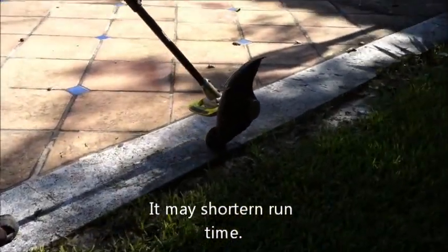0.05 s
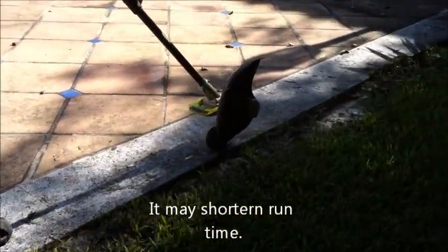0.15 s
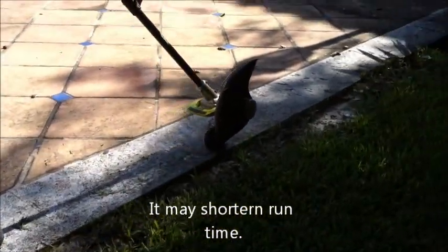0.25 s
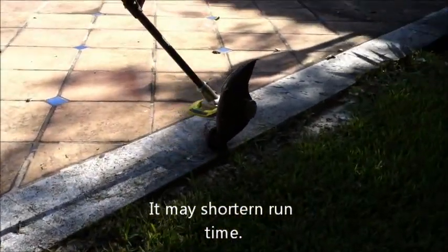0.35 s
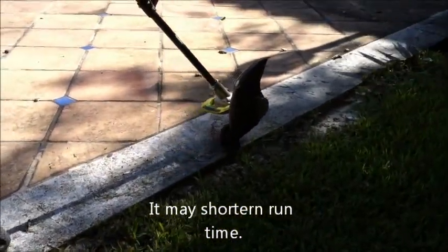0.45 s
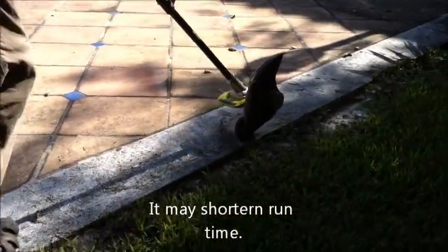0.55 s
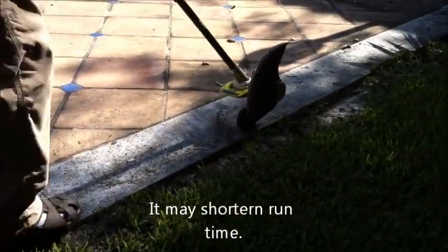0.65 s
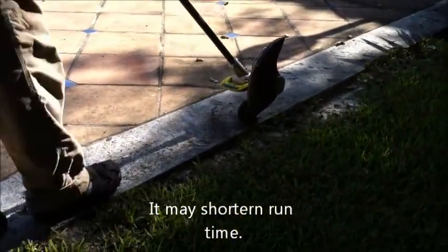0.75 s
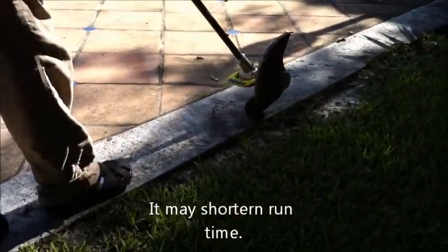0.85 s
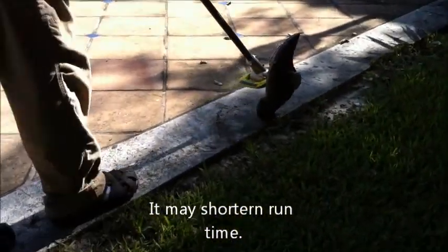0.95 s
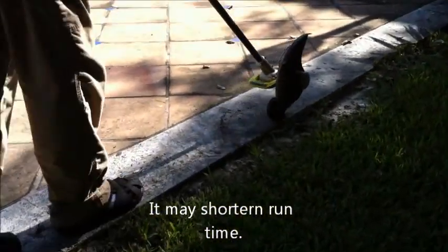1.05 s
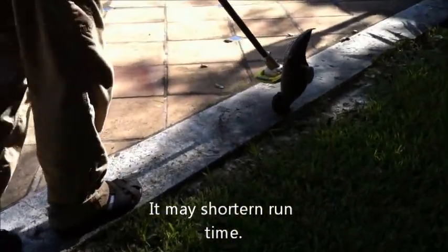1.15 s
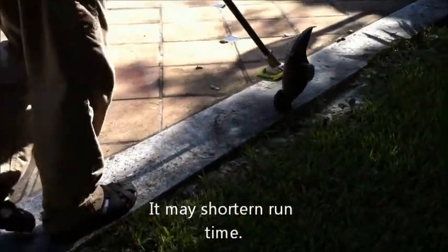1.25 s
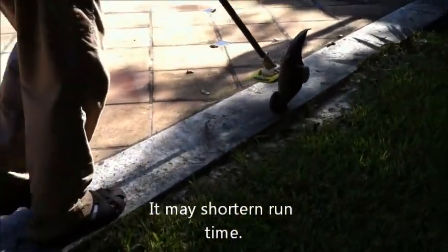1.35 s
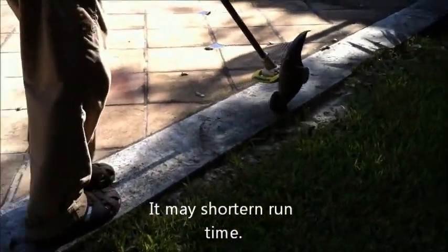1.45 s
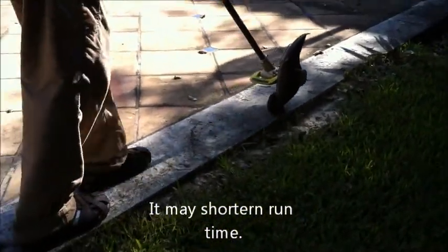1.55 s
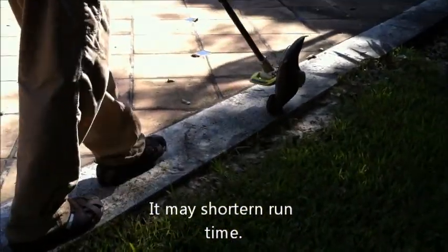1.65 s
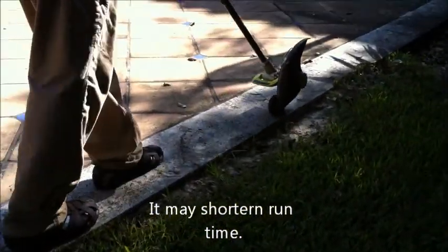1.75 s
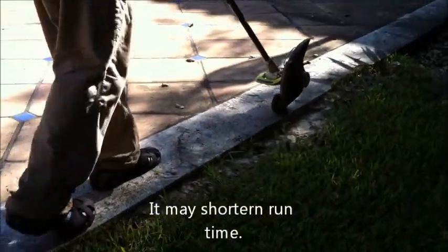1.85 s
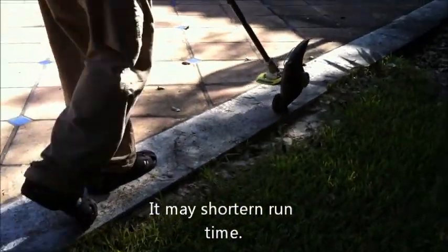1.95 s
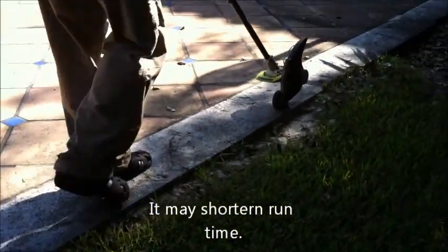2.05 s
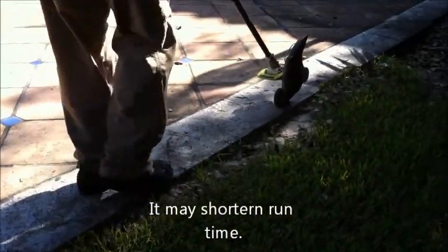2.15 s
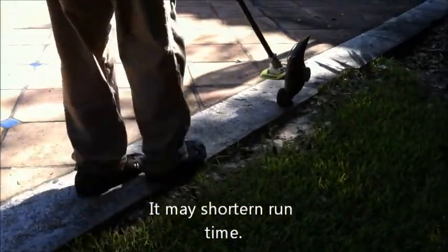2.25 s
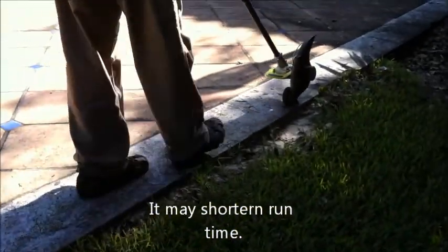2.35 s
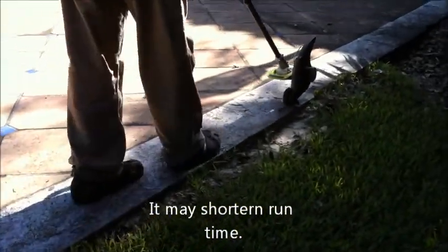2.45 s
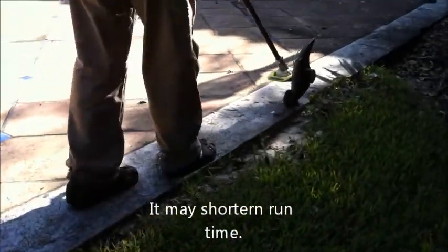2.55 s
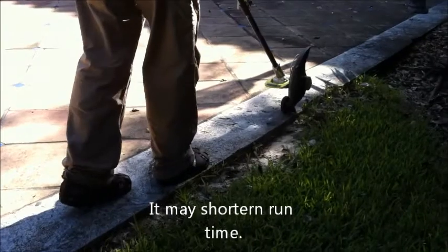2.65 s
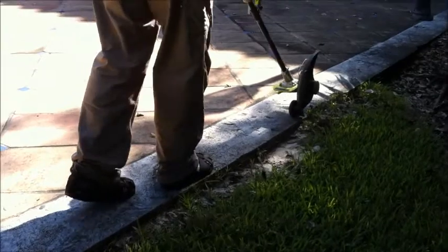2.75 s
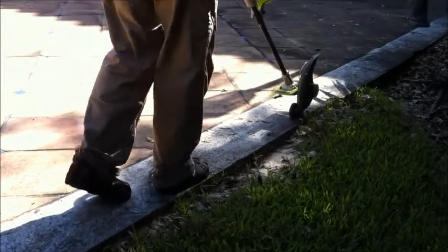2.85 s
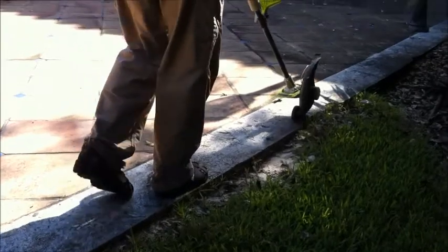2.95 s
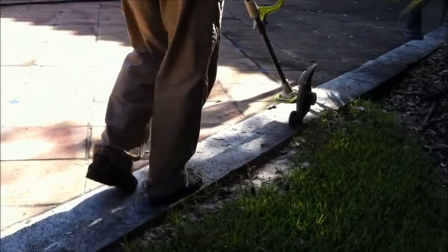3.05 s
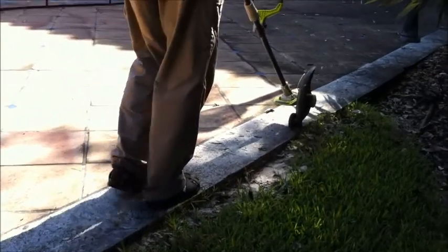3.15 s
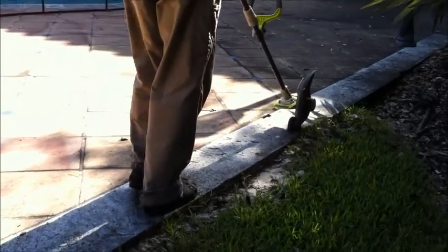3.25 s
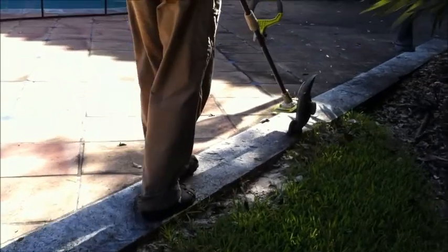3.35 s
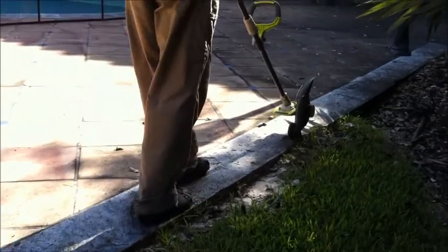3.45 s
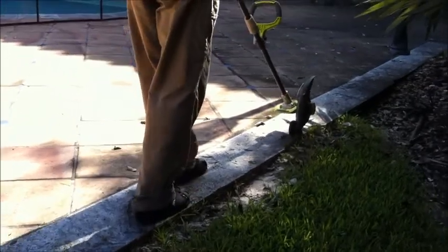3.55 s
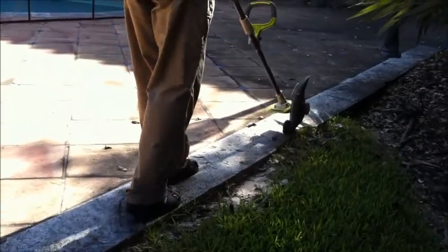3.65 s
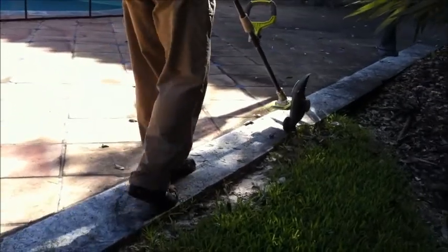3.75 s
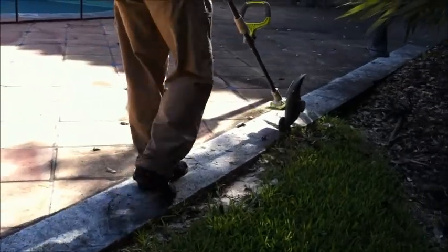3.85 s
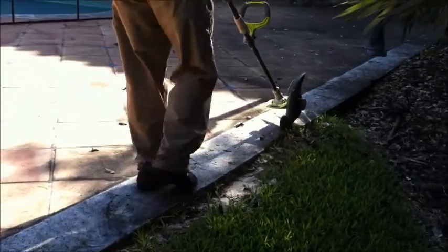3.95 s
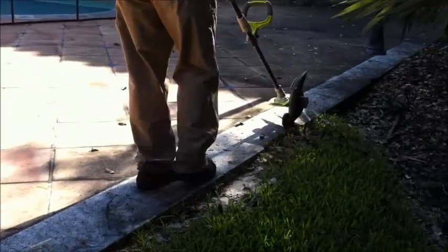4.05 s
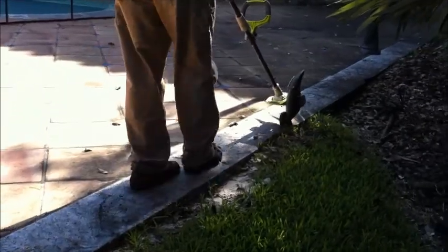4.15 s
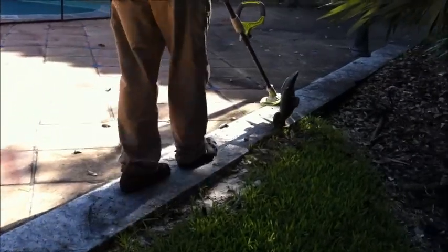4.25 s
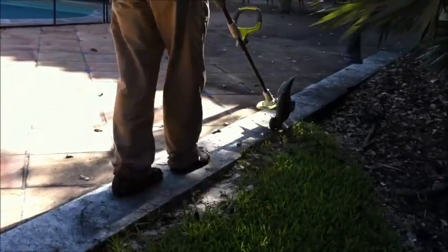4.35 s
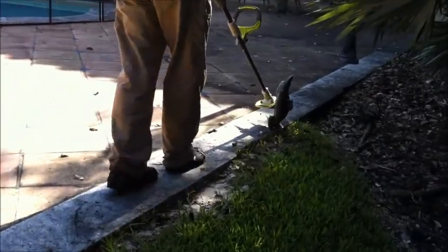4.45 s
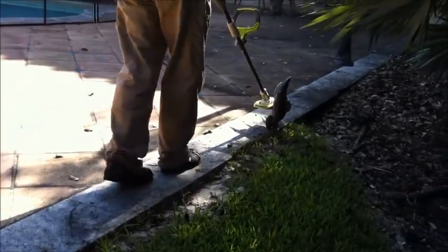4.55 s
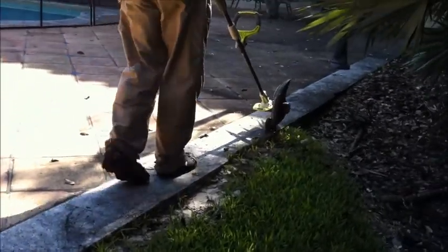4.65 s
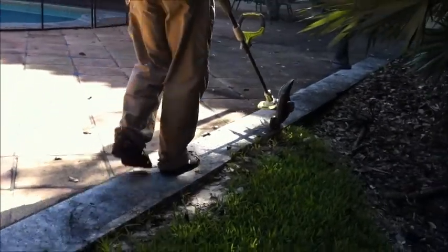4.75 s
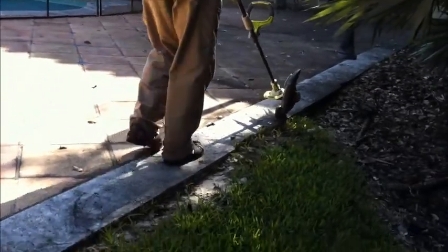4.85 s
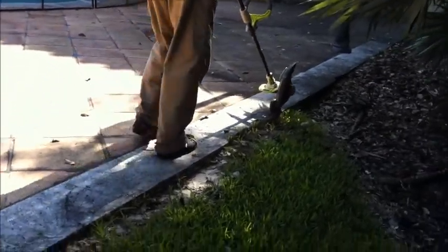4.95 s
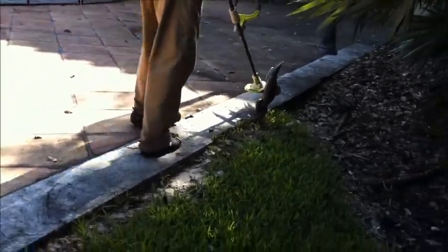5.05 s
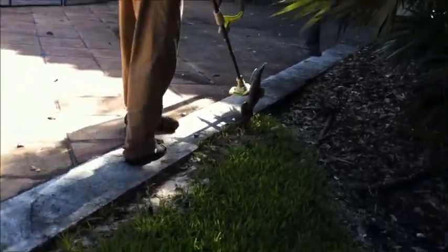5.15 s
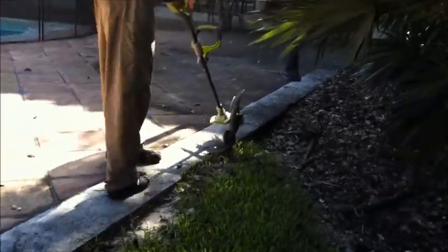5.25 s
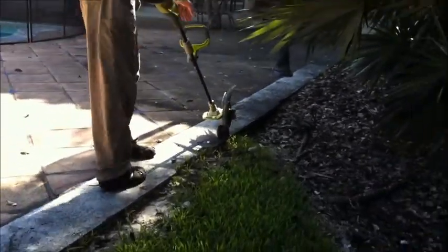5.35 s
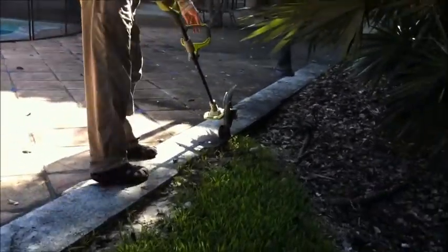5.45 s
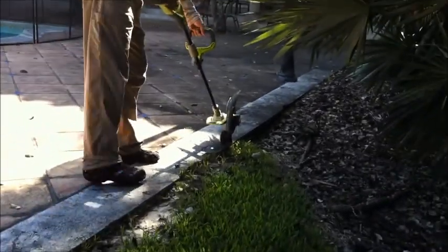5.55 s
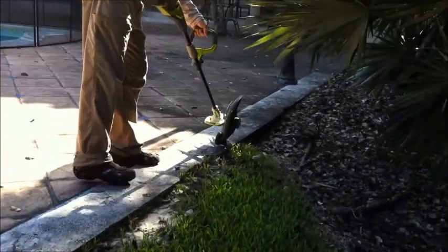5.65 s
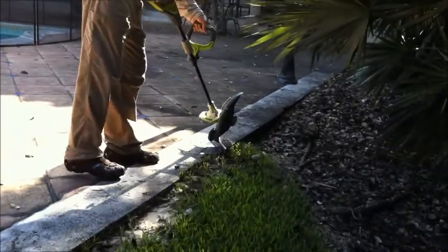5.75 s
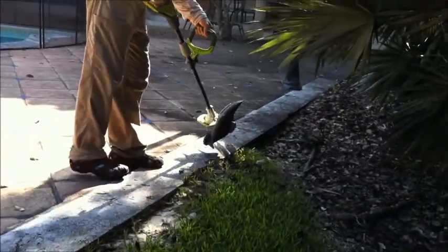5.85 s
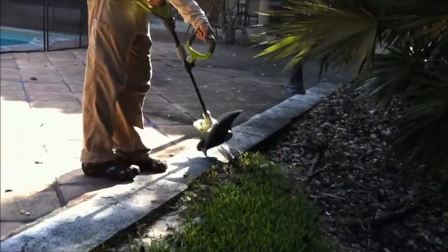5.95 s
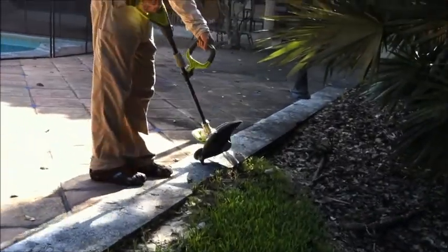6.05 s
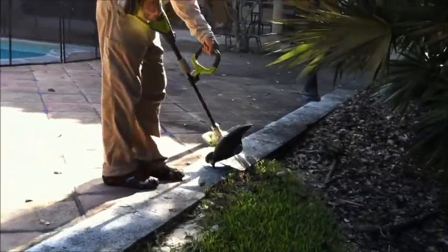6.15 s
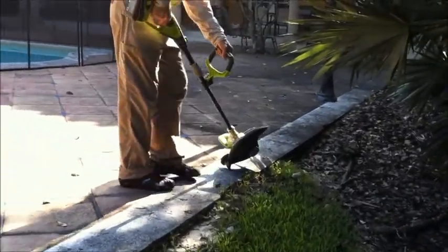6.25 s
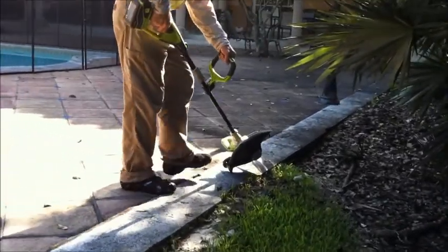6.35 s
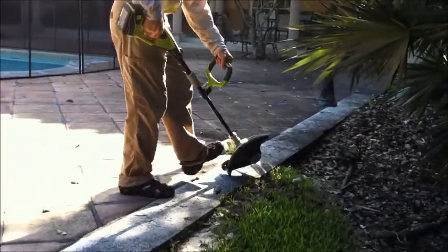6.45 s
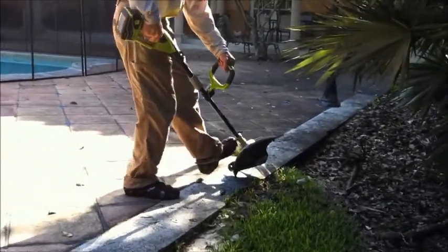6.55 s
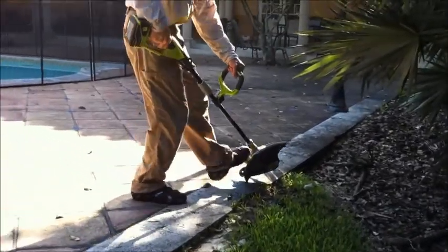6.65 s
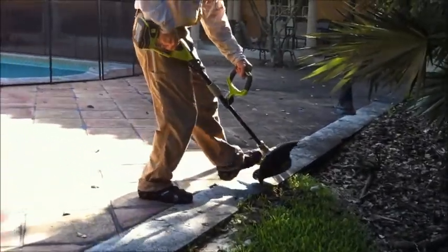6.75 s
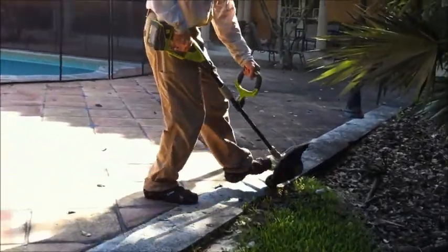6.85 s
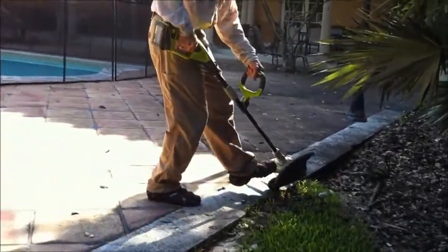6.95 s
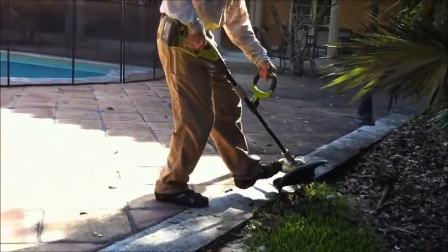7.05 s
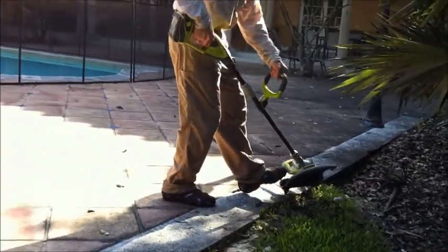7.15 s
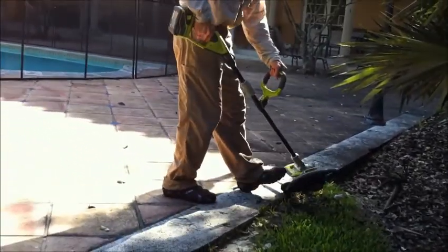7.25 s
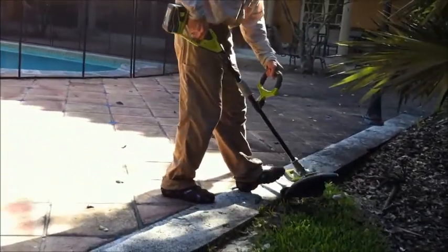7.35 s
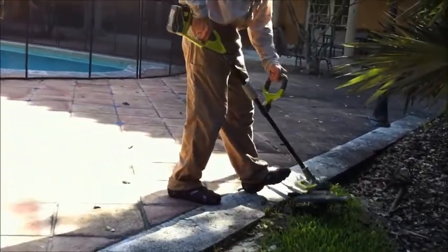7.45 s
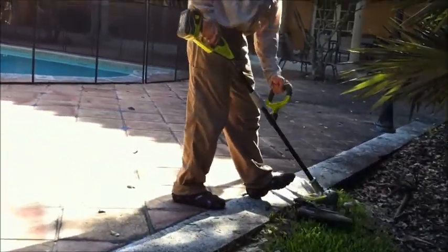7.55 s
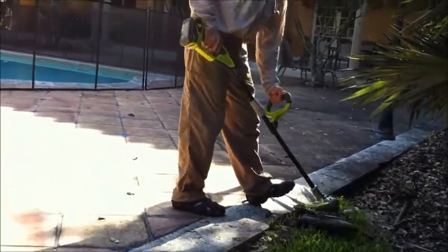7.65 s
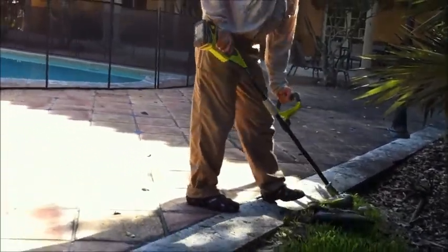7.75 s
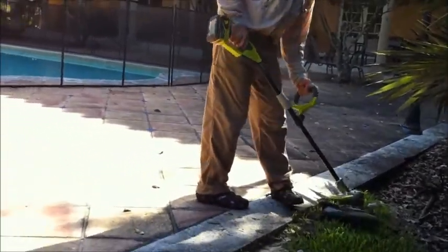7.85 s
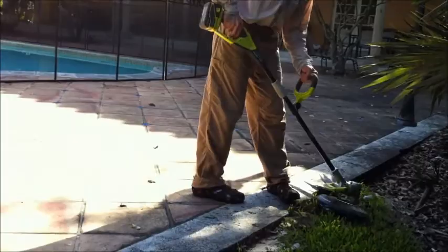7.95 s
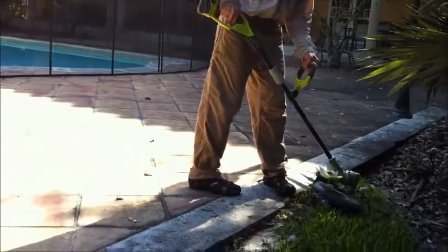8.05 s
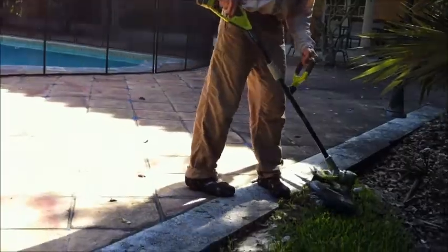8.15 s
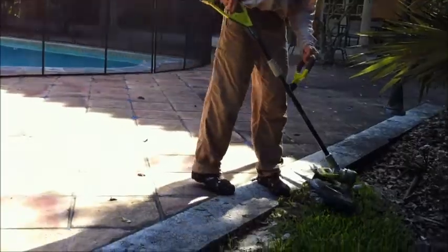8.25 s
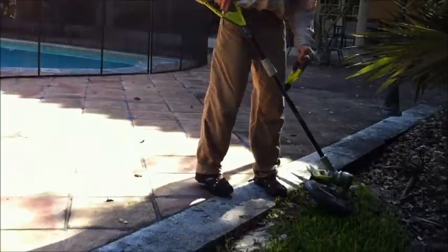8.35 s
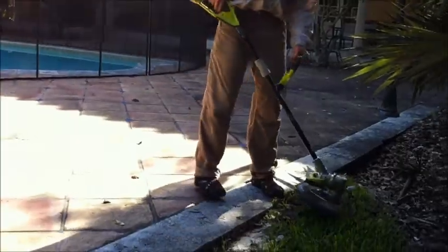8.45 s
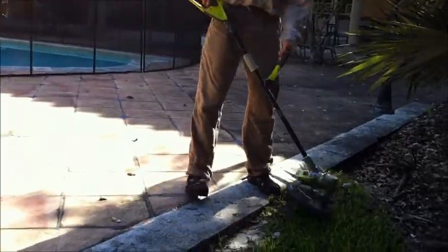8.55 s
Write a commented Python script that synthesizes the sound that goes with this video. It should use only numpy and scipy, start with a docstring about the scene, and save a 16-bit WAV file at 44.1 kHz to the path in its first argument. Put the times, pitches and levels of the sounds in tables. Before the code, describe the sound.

Outdoors and close to the microphone, a battery trimmer edges a curb with a bright, gritty, fluttering swish and a steady whine, with a few soft footsteps underneath. One sharp snap comes early, then a quick burst of cracks as the line catches. The motor coasts to a stop. Much quieter plastic clicks, dull knocks and hollow rattles follow as the tool is handled, over a faint pump hum and barely audible bird chirps.

```python
"""Line trimmer edging a curb

A cordless trimmer's line swishes and slaps the concrete on every turn, over a hum and a gear whine.
Grit snaps off the line, it snags, and the motor runs down. The tool clicks, knocks and rattles as it
is turned over, brushed by cloth and grass. Footsteps bump softly, a pool pump hums in the quiet yard
and a far bird calls thinly."""
import sys
import numpy as np
from scipy import signal
from scipy.fft import rfft, irfft
from scipy.io import wavfile
from scipy.ndimage import map_coordinates

SR = 44100
rng = np.random.default_rng(int(sys.argv[2]) if len(sys.argv) > 2 else 0)


def generate_wav(sig):
    """Save sig (samples, or channels by samples) to the path in sys.argv[1] as 16-bit PCM at SR."""
    pcm = np.round(np.clip(np.atleast_2d(sig).T, -1, 1) * 32767).astype(np.int16)
    wavfile.write(sys.argv[1], SR, pcm)


N = 378806
T = np.arange(N) / SR
RELEASE_S = 4.91  # the trigger is let go
# dull body of a knock and of the slack line's flapping: (frequency [Hz], gain [dB])
THUD_EQ = [(50, -53), (110, -27), (150, -10.5), (195, -2), (245, -10.5), (275, -6), (310, -2.5), (410, 1.5),
           (480, -7.5), (650, -23.5), (1200, -44)]


def amp(db):
    return 10 ** (np.asarray(db) / 20)


def unit(x):
    return x / np.sqrt(np.mean(x ** 2) + 1e-20)


def running(x):
    """Scale to a standard deviation of 1 while the motor is on."""
    return x / x[T < RELEASE_S].std()


def curves(rows):
    """One automation curve for each column after the time."""
    s, *columns = np.transpose(rows)
    return [np.interp(T, s, c) for c in columns]


def read(points, hz):
    """Join points by straight lines on a log-frequency axis."""
    f, value = np.transpose(points)
    return np.interp(np.log(hz + 1), np.log(f + 1), value)


def colour(x, eq):
    """Minimum-phase EQ through (Hz, dB) points."""
    log_gain = np.log(amp(read(eq, abs(np.fft.fftfreq(4096, 1 / SR)))))
    taps = np.fft.ifft(np.exp(np.conj(signal.hilbert(log_gain)))).real
    return signal.oaconvolve(x, taps[:len(taps) // 2])[:len(x)]


def ring(x, modes):
    """Steep resonances (Hz, width Hz, dB) in parallel."""
    out = 0
    for hz, width, db in modes:
        b, a = signal.iirpeak(hz, hz / width, SR)
        out += amp(db) * signal.lfilter(b, a, signal.lfilter(b, a, x))
    return out


def moving_ring(x, modes, shift):
    """Steep resonances whose pitches are multiplied by a curve."""
    out = 0
    for hz, width, db in modes:
        carrier = np.exp(2j * np.pi * np.cumsum(hz * shift) / SR)
        r = np.exp(-np.pi * width / SR)
        out += amp(db) * (carrier * signal.lfilter([(1 - r) ** 2], [1, -2 * r, r * r], x / carrier)).real
    return out


def noise():
    return rng.standard_normal(N)


def wander(hz):
    """Smooth random modulation of rms 1, up to about the given rate."""
    return unit(irfft(rfft(noise()) * np.exp(-(np.fft.rfftfreq(N, 1 / SR) / hz) ** 2), N))


def grains(per_s, spread_db):
    """Random ticks of unequal size."""
    ticks = noise() * (rng.random(N) < per_s / SR)
    return unit(ticks * amp(spread_db * np.minimum(rng.exponential(1, N), 3)))


def whistle(hz, width):
    """A narrow noise band that follows a pitch curve."""
    return unit(((wander(width) + 1j * wander(width)) * np.exp(2j * np.pi * np.cumsum(hz) / SR)).real)


def scatter(x, db):
    """Turn a random signal into a gain with the given spread, without extremes."""
    return amp(db * np.clip(x, -2, 2))


def lobe(turns, width):
    """One smooth bump on every turn; width in turns."""
    return np.exp(-(np.sin(np.pi * turns) / (np.pi * width)) ** 2)


def add(mix, s, sound):
    part = mix[max(round(s * SR), 0):][:len(sound)]
    part += sound[:len(part)]


def head_motion(snag_s=4.275, snag_half_s=.12, sag=.16, lasting_sag=.007, coast_s=.44, cutout_s=.077):
    """The head spins, sags and stumbles in the snag, then coasts down, fading as it slows."""
    # free spin of the head: (time [s], speed [turns/s])
    free_speed = [(0, 97.2), (.5, 99.2), (1.1, 101.3), (1.7, 101.2), (2.1, 102.4), (2.7, 102.7),
                  (2.9, 100.9), (3.3, 99.9), (3.7, 100.6), (4.1, 99.7)]
    snag = np.exp(-((T - snag_s) / snag_half_s) ** 4)
    coasted = np.maximum(T - RELEASE_S, 0)
    spin_left = np.exp(-coasted / coast_s)
    drive_off = 1 - np.exp(-coasted / cutout_s)
    speed = curves(free_speed)[0] * (1 - sag * snag - lasting_sag * (T > snag_s)) * spin_left
    stumble = .002 + .1 * snag + .09 * drive_off
    turns = np.cumsum(speed * (1 + stumble * wander(25))) / SR
    coast_db = 16 * np.log2(spin_left) - 9 * drive_off
    return speed / speed[0], turns, snag, coast_db


def curb_bounce(x, share):
    """The stone returns the swish, inverted and a moment late: a hollow comb."""
    # the reflection fades as the head moves away: (time [s], delay [s], strength [0-1])
    reflection = [(0, .00113, .5), (.55, .00112, .5), (1.45, .00103, .25), (1.8, .001, .02)]
    delay, strength = curves(reflection)
    late = map_coordinates(x, [(T - delay) * SR], order=3)
    return (x - share * strength * late) / np.sqrt(1 + (share * strength) ** 2)


def tip_whistle(pace, turns, force, hz=7700, sweep=.16, swing=.08, db=-12):
    """The tip sheds eddies: a whistle that slides up into each pass and down after it."""
    pitch = hz * pace * (1 + sweep * np.cos(2 * np.pi * turns) + swing * wander(130))
    return amp(db) * running(force * (.25 + lobe(turns, .13))) * whistle(pitch, width=420)


def cutting_line(pace, passes, contact, raps, eddies, bite, depth, whip_db=-10.5, dull_hz=8500):
    """The line swishes, slaps the curb in gritty bursts and whips it with one sharp pulse a turn."""
    # tone of the swish, the slap and the whip: (frequency [Hz], gain [dB])
    swish_eq = [(2000, -42.5), (3200, -19), (3750, -10), (4200, -14), (4700, -5), (5150, -4), (5750, 1),
                (6200, -1), (6700, 1), (7300, 0.5), (8800, -1), (10300, -7), (12500, -8), (14500, -8.5),
                (16000, -22.5)]
    slap_eq = [(150, -39), (400, -20.5), (1200, 1.5), (3000, -9.5), (4500, 6), (6000, -27), (9000, 6.5),
               (12000, 8), (16000, -2)]
    whip_eq = [(100, -29.5), (600, -9), (1000, 9.5), (1400, -6), (2400, -16.5), (3300, -8.5), (4500, -1.5),
               (5800, 3), (9000, 3), (16000, -8.5)]
    swish = running(colour(noise() * (1 + depth * passes), swish_eq))
    slaps = bite * running(colour(contact * grains(9000, 3.4), slap_eq))
    whips = -amp(whip_db) * depth * running(colour(raps * scatter(noise(), db=1.6), whip_eq))
    graze = unit(scatter(wander(11), db=1.8))  # the tip meets the stone in short bouts
    bright = swish + whips + graze * (slaps + depth * eddies)
    # a slowing line keeps only a dull swish
    slow = np.clip(3 * (1 - pace), 0, 1)
    dull = signal.filtfilt(*signal.butter(2, dull_hz, fs=SR), swish)
    return curb_bounce((1 - slow) * bright + slow * dull, share=.15) / np.sqrt(1 + bite ** 2)


def air_rush(passes, contact, depth, push_db, db=-39):
    """Air stirred by the line: a midrange rush that pulses with each pass."""
    # tone of the rush: (frequency [Hz], gain [dB])
    rush_eq = [(60, -22), (130, -8.5), (200, -5), (340, -1), (450, 0.5), (560, -7), (700, -3.5), (880, 3),
               (1120, 2), (1500, -4), (2100, -4.5), (2430, -8), (2900, -5), (3300, -7), (3750, -6.5),
               (4200, -8), (5000, -17.5), (9000, -52)]
    level = amp(db + .91 * push_db - 1.5 * depth + wander(18))
    rush = running(colour(noise() * (.36 + passes + depth * contact), rush_eq))
    return level * curb_bounce(rush, share=.48)


def gear_whine(turns, raps, knock_db=-2, trim_db=-2):
    """The teeth rasp and knock under the load of each turn, ringing the hollow gear case."""
    # resonance of the case: (frequency [Hz], gain [dB])
    case_eq = [(1200, -45), (2420, -24), (2660, -4), (2810, 0), (3000, -2.5), (3230, -19), (5000, -40)]
    # fader of the whine: (time [s], level [dB])
    fader = [(0, -35), (1.25, -46.5), (1.5, -32), (1.55, -48), (1.8, -40.5), (3.3, -38), (4.1, -38),
             (4.45, -42)]
    rasp = running(noise() * (.13 + lobe(turns, .065) + .44 * lobe(turns - .5, .13)))
    teeth = rasp + amp(knock_db) * running(raps)
    return amp(curves(fader)[0] + trim_db) * running(colour(teeth, case_eq))


def head_hum(turns, push_db, trim_db=-1, rough_hz=45, roughness=.12):
    """Harmonics of the head and side tones from its rocking, roughened by uneven turns."""
    # tones of the head: (multiple of the speed [ratio], base level [dB], rise with push [dB/dB],
    # rise with timbre [dB/unit], unsteadiness [0-1])
    partials = [(1, -53.5, 0.94, -2, .2), (1.141, -61.5, -0.4, 1.5, .6), (2, -51.5, 0.25, -2, 0.5),
                (3, -46.5, 1, 6, 0.25), (3.151, -54, 0.26, -4, 0.6), (4.001, -54, 1.1, 1, 0.6),
                (4.16, -47.5, 0.7, 4.5, 0.25), (4.87, -54.5, 0.5, 3, 0.5), (5, -55, -0.7, -0.5, 0.3),
                (6.12, -61.5, 0.06, -6, 0.6), (8.199, -57.5, 1, -3.5, 0.9)]
    # from hollow (negative) to buzzing (positive): (time [s], timbre [units])
    timbre_moves = [(0, -0.67), (1.25, 0.089), (1.9, -0.63), (2.55, -2.64), (2.88, -0.86), (3.1, 0.044),
                    (3.9, 0.67), (4.5, -0.46)]
    timbre, out = curves(timbre_moves)[0], 0
    for multiple, db, follow, timbre_db, loose in partials:
        tone = unit(1 + loose * wander(6.7)) * np.cos(2 * np.pi * multiple * turns + loose * wander(11))
        out += np.sqrt(2) * amp(db + follow * push_db + timbre_db * timbre) * tone
    return amp(trim_db) * out * (1 + roughness * wander(rough_hz))


def guard_ring(raps, passes, rasp_db=-1.5, drift_per_s=.05, waver=.011):
    """One rap a turn, and the air of each pass, ring the plastic guard."""
    # resonances of the guard: (pitch [Hz], width [Hz], gain [dB])
    modes = [(1305, 150, 5.5), (2150, 280, -2), (2400, 260, -4), (3200, 300, -7), (4400, 450, -7),
             (5570, 200, -3)]
    # fader of the ringing: (time [s], level [dB])
    fader = [(0, -28.5), (.35, -27), (.5, -32.5), (.9, -32.5), (1.5, -39), (1.55, -52.5), (2.8, -42.5),
             (4.5, -62.5)]
    rasp = amp(rasp_db) * running(noise() * (.18 + passes))
    shift = 1 + drift_per_s * np.minimum(T, 2) + waver * wander(21)
    return amp(curves(fader)[0]) * running(moving_ring(running(raps) + rasp, modes, shift))


def trimmer(usual_db=-23, rock_per_turn=.12, slap_turns=.076, snag_bite_db=14, snag_hum_db=-9):
    """Both ends of the spinning line pass the curb on each turn, the longer one harder."""
    # loudness control for swish, rush and hum: (time [s], level [dB])
    fader = [(0, -14.5), (.55, -15), (.85, -17), (1.518, -16), (1.54, -26.5), (1.8, -23), (2.25, -21),
             (2.95, -19.5), (4.135, -18.5), (4.15, -21.5), (4.42, -27.5), (4.88, -25.5)]
    # how hard the line bites: (time [s], slap against swish [dB], pulsing depth [ratio])
    curb_bite = [(0, -8, 0.64), (.55, -4, 1.1), (1.1, -8, 1.08), (2.6, -9.5, 0.84), (3.2, -9.5, 0.38),
                 (4.0, -10, 0.36), (4.55, -22, 0.8)]
    pace, turns, snag, coast_db = head_motion()
    loud_db = curves(fader)[0]
    push_db = loud_db - usual_db
    bite_db, depth = curves(curb_bite)
    bite = amp(bite_db + snag_bite_db * snag)
    sway_db = .45 * wander(9)  # the line wanders toward and away from the curb
    # no two passes are alike, and the head rocks about once in eight turns
    force = scatter(noise(), db=1.1)[np.round(2 * turns).astype(int)]
    force *= 1 + .12 * np.sin(2 * np.pi * rock_per_turn * turns)
    passes = force * (lobe(turns, .31) + .45 * lobe(turns - .5, .19))
    contact = force * (lobe(turns, slap_turns) + .53 * lobe(turns - .5, slap_turns))
    raps = force * np.diff(np.floor(turns + .02 * wander(120)), prepend=0)  # one jittered pulse a turn
    eddies = tip_whistle(pace, turns, force)
    line = amp(loud_db + sway_db - 3.5) * cutting_line(pace, passes, contact, raps, eddies, bite, depth)
    air = air_rush(passes, contact, depth, push_db)
    drive = gear_whine(turns, raps) + amp(snag_hum_db * snag) * head_hum(turns, push_db)
    drive *= amp(coast_db)  # whine and hum die first in coasting
    sound = line + air + drive + guard_ring(raps, passes) + slack_flap(snag, passes)
    return sound * amp(coast_db) * np.interp(T, [5.15, 5.4], [1, 0])


def yard(air_db=-60.5, bands_db=-70):
    """Soft outdoor air and the pool pump's hum; both come up after the motor stops."""
    # tone of the air: (frequency [Hz], gain [dB])
    air_eq = [(18, -56.5), (30, -51), (75, -21.5), (90, -24), (112, -17.5), (141, -9), (319, -10),
              (345, -1), (384, -17), (473, -12.5), (1860, -19.5), (2680, -19.5), (4910, -26), (7270, -26.5),
              (16000, -32)]
    # tones of the pump: (pitch [Hz], level [dB])
    pump_tones = [(110, -67.5), (220.5, -73.5), (355, -74)]
    # faint bands in the background: (pitch [Hz], width [Hz], gain [dB])
    band_modes = [(2700, 160, -2), (1002, 300, 0), (383, 96, 3.5)]
    pump = sum(amp(db + 1.4 * wander(3)) * np.sqrt(2) * np.sin(2 * np.pi * hz * T + .3 * wander(3))
               for hz, db in pump_tones)
    rise_db = np.interp(T, [5.9, 6.6], [-5, 0])
    air = amp(air_db + .39 * rise_db - 2.5 * wander(5)) * unit(colour(noise(), air_eq))
    bands = amp(bands_db + 1.7 * wander(5)) * unit(ring(noise(), band_modes))
    return air + amp(rise_db) * pump + bands


def footsteps():
    """Dull bumps of walking: soft low swells of a few cycles each."""
    # bumps: (middle [s], level [dB], pitch [Hz], length [s])
    steps = [(0.108, -53.5, 47, 0.1), (0.562, -53, 54.5, 0.053), (0.615, -34, 201, 0.06),
             (1.045, -52, 43, 0.065), (3.253, -51, 34, 0.063), (4.132, -54, 45, .06),
             (4.272, -56, 40, 0.059), (4.427, -55, 36.5, 0.045)]
    out = np.zeros(N)
    for s, db, hz, length in steps:
        t = np.arange(0, length, 1 / SR)
        tone = np.sin(2 * np.pi * (hz * t + rng.random()))
        add(out, s - length / 2, amp(db) * np.hanning(len(t)) * tone)
    return out


def grit(crumble_db=-7, crumble_s=.0005, spray_s=.008):
    """Bits of stone crack against line and guard: a sharp pulse, its crumbling and a spray of dust."""
    # flying chips: (time [s], peak [dB], spray against the pulse [dB])
    chips = [(1.5214, -4, -32), (4.0905, -11, -30), (4.1213, 1.5, -26), (4.1411, 1, -28), (4.182, .5, -30),
             (4.2126, 0, -27), (4.2552, -8, -25), (4.2803, -15, -18), (4.2866, -13, -26), (4.2971, 1, -25),
             (4.3303, -4, -26)]
    # tone of a crack: (frequency [Hz], gain [dB])
    crack_eq = [(100, -45), (600, -18), (2500, -16), (3800, -9), (5300, -2), (7800, -3.5), (10000, -0.5),
                (12000, -2.5), (14500, -1), (16000, -6)]
    out, t = np.zeros(N), T[:2048]
    for s, db, spray_db in chips:
        dust = amp(crumble_db) * np.exp(-t / crumble_s) + amp(spray_db) * np.exp(-t / spray_s)
        crack = colour(dust * rng.standard_normal(len(t)) - (t == 0), crack_eq)
        add(out, s, amp(db) * crack / abs(crack).max())
    return out


def slack_flap(snag, passes, db=-42):
    """In the snag the line goes slack and flaps dully."""
    return amp(db) * np.sqrt(snag) * running(colour(noise() * (.3 + passes), THUD_EQ))


def clicks(chatter_db=-25, chatter_s=.0014, tail_db=-41, tail_s=.031):
    """Plastic parts snap or clunk into place: one sharp push, a brief chatter and a faint tail."""
    # snagged line, trigger, catch and guard: (time [s], peak [dB], pitch [Hz], width [Hz])
    hits = [(4.223, -23, 1500, 1600), (4.266, -24, 1910, 700), (4.2863, -22, 1500, 2000),
            (4.342, -20, 1600, 900), (4.373, -25, 1110, 1400), (5.4433, -50, 715, 513),
            (5.6018, -33.5, 2370, 650), (5.7043, -22.5, 3980, 790), (6.2288, -34, 4020, 480),
            (6.2468, -37, 726, 250), (6.769, -36, 323, 130), (6.955, -27.5, 260, 110),
            (6.988, -33.5, 348, 130), (7.048, -35, 860, 150), (7.2396, -41, 2900, 130),
            (7.443, -39, 420, 90), (7.5613, -30, 3540, 800), (7.729, -37, 754, 450),
            (7.886, -36, 6570, 3480)]
    # resonances of a plastic part: (pitch [ratio], width [ratio], gain [dB])
    plastic = [(.36, .8, -15), (.56, .6, -4), (1, 1, 4.5), (1.34, .8, -1), (1.6, .8, -9)]
    out, t = np.zeros(N), T[:4096]
    decay = amp(chatter_db) * np.exp(-t / chatter_s) + amp(tail_db) * np.exp(-t / tail_s)
    for s, db, hz, width in hits:
        modes = [(hz * ratio, width * share, mode_db) for ratio, share, mode_db in plastic]
        snap = ring((t == 0) + rng.standard_normal(len(t)) * decay, modes)
        add(out, s, amp(db) * snap / abs(snap).max())
    return out


def bird(slide_s=.04, blur_hz=750):
    """A high, breathy whistle slides up and holds."""
    # calls: (time [s], length [s], first pitch [Hz], last pitch [Hz], level [dB])
    calls = [(5.355, 0.092, 5660, 7600, -70), (6.592, 0.14, 6040, 7400, -76),
             (8.016, 0.14, 6050, 7100, -74), (8.515, 0.069, 5700, 8300, -69)]
    out = np.zeros(N)
    breath = (wander(blur_hz) + 1j * wander(blur_hz)) / np.sqrt(2)
    for s, length, first_hz, last_hz, db in calls:
        t = np.arange(0, length, 1 / SR)
        hz = np.interp(t, [0, slide_s], [first_hz, last_hz])
        note = (np.roll(breath, -round(s * SR))[:len(t)] * np.exp(2j * np.pi * np.cumsum(hz) / SR)).real
        add(out, s, amp(db) * note * signal.windows.tukey(len(t), .5))
    return out


def rustle(waver_db=2):
    """Trouser legs and grass brush the tool in swells of fine grains."""
    # brushes: (middle [s], half length [s], level [dB])
    brushes = [(5.567, 0.07, -60.5), (6.796, 0.032, -60), (6.93, 0.072, -58), (7.105, 0.64, -58.5),
               (7.504, 0.068, -62), (7.71, 0.052, -62), (7.963, 0.062, -60.5), (8.337, 0.059, -61.5)]
    # tone of cloth and grass: (frequency [Hz], gain [dB])
    cloth_eq = [(150, -25), (380, 14.5), (600, 4), (1000, 11), (1600, 1), (3000, 4.5), (5500, -1),
                (8000, -7.5), (14000, -7), (16000, -23)]
    level = sum(amp(db) * np.exp(-((T - s) / half) ** 2) for s, half, db in brushes)
    return level * amp(waver_db * wander(28)) * unit(colour(grains(7000, .83), cloth_eq))


def knocks(rise_share=.15, shaft_db=-5):
    """Clusters of tiny impacts: a dull thud, a hollow clatter that rings the shaft, a gritty scrape."""
    # the tool is turned over: (time [s], thud [dB], clatter [dB], scrape [dB], fade [s])
    hits = [(6.221, -38.5, -49, -43.5, 0.013), (6.229, -42, -40, -46, 0.0031),
            (6.242, -49, -53, -56, 0.025), (6.32, -58.5, -60, -60.5, 0.1), (6.768, -31, -42.5, -50, 0.0069),
            (6.79, -49, -63, -66, 0.11), (6.895, -41, -68, -70, 0.13), (6.957, -36, -42, -55, 0.016),
            (6.984, -43, -47, -44, 0.012), (7.005, -65, -43, -46, 0.026), (7.04, -63, -49, -70, 0.011),
            (7.204, -40, -41, -42, 0.013), (7.233, -47, -46.5, -47, 0.02), (7.435, -41.5, -48, -52, 0.037),
            (7.542, -45, -70, -70, 0.013), (7.559, -46, -40, -48, 0.011), (7.61, -52, -62, -53, 0.027),
            (7.739, -48, -48, -55, 0.0082), (7.885, -47, -56, -52, 0.0087)]
    # tone of the clatter and the scrape: (frequency [Hz], gain [dB])
    clatter_eq = [(300, -25), (580, -1), (670, 9.5), (820, 6.5), (1000, 0), (1400, -3.5), (1900, -1),
                  (3000, -7), (6000, -70)]
    scrape_eq = [(1200, -59), (2600, 3), (4000, -2), (5500, -2), (7500, -6), (11000, -12.5), (16000, -9)]
    # resonances of the shaft's tube: (pitch [Hz], width [Hz], gain [dB])
    tube = [(1000, 230, 13), (1920, 420, 2.5), (2850, 24, 15)]
    envelopes = np.zeros((3, N))
    for s, *layer_db, fade in hits:
        age, rise = T - s, rise_share * fade
        shape = np.clip(age / rise, 0, 1) * np.exp(-np.maximum(age - rise, 0) / fade)
        envelopes += amp(layer_db)[:, None] * shape
    textures = noise(), grains(4000, .94), grains(3700, 1.4)
    body = sum(colour(envelope * texture, eq) / colour(texture, eq).std()
               for envelope, texture, eq in zip(envelopes, textures, (THUD_EQ, clatter_eq, scrape_eq)))
    shaft = ring(envelopes[1] * textures[2], tube) / ring(textures[2], tube).std()
    return body + amp(shaft_db) * shaft


def groan(start_s=6.78, length_s=.22, glide_hz=(275, 180), swell_db=(-61.5, -50.5)):
    """The guard drags over the ground: a rough low tone that sinks and swells as it is pressed down."""
    progress = np.clip((T - start_s) / length_s, 0, 1)
    gate = np.clip(10 * np.minimum(progress, 1 - progress), 0, 1)
    pitch = np.interp(progress, [0, 1], glide_hz)
    return gate * amp(np.interp(progress, [0, 1], swell_db)) * whistle(pitch, width=42)


def rattles(detune_share=.045, attack_s=.00043, tick_db=-2, tick_s=.0013):
    """Loose parts tick against the hollow housing, which rings a little differently at every spot."""
    # taps: (time [s], peak [dB], brightness [dB/octave])
    taps = [(6.926, -45.5, -9), (6.9547, -29, -1), (6.962, -30, 3), (6.995, -32, 4), (7.008, -31, 4),
            (7.021, -31, 0), (7.035, -40, 0), (7.051, -39, 6), (7.211, -34, 9), (7.2162, -29, 7),
            (7.4423, -44, -2), (7.451, -35, 10), (7.4646, -35, 6), (7.5608, -48, 3), (7.577, -35, -5),
            (7.757, -42, 1)]
    # modes of the housing: (pitch [Hz], level [dB], t60 [s])
    housing = [(418, 11, 0.032), (690, -13, 0.04), (940, 1, 0.026), (1214, 1, 0.045), (1870, -0.5, 0.057),
               (2080, -6, .025), (2740, -9, .03), (3190, 1.5, 0.028), (3690, -9, 0.033), (4300, -6, 0.03),
               (5100, -9, 0.014), (5700, -10, 0.014), (7100, -11, .012)]
    out, t = np.zeros(N), T[:6000]
    hz, mode_db, t60 = np.transpose(housing)[:, :, None]
    for s, db, tilt in taps:
        spot, phase, detune = rng.standard_normal((3, len(hz), 1))
        decays = amp(mode_db + tilt * np.log2(hz / 2000) + 2 * spot - 60 * t / t60)
        modes = decays * np.sin(2 * np.pi * (hz * (1 + detune_share * detune) * t + phase))
        tick = amp(tick_db + 2 * tilt) * np.exp(-t / tick_s) * rng.uniform(-.75, 1, len(t))
        tap = modes.sum(0) * np.minimum(t / attack_s, 1) + tick
        add(out, s, amp(db) * tap / abs(tap).max())
    return signal.sosfilt(signal.butter(3, 180, "high", fs=SR, output="sos"), out)


def echo(x, predelay_s=.008):
    """Scattered returns from the deck, the fence and the house."""
    # decay of the returns: (frequency [Hz], t60 [s])
    decay_times = [(200, 0.085), (1000, 0.2), (4000, 0.072), (14000, 0.12)]
    hz, t, spectrum = signal.stft(rng.standard_normal(SR // 2), SR, nperseg=256)
    decay = amp(-60 * t / read(decay_times, hz)[:, None]) * (t > predelay_s)
    tail = signal.istft(spectrum * decay, SR, nperseg=256)[1]
    return signal.oaconvolve(x, tail / np.linalg.norm(tail))[:N]


def scene():
    """Mono mix: the tool close and fairly dry, the bird mostly echo, the yard underneath."""
    # so small a head radiates almost nothing below its turning rate
    machine = signal.lfilter(*signal.butter(2, 55, "high", fs=SR), trimmer() + grit())
    handling = clicks() + knocks() + rattles() + groan() + rustle()
    calls = bird()
    returns = echo(amp(-15) * machine + amp(-6) * handling + amp(11.5) * calls)
    return (machine + handling + calls + returns + footsteps() + yard())[None]


def record(dry):
    """Round off the sharpest peaks and cut the very top of the treble."""
    ceiling, cutoff_hz = .78, 16100
    rounded = dry / (1 + (dry / ceiling) ** 6) ** (1 / 6)
    lowpass = signal.firwin(401, cutoff_hz, window=("kaiser", 9), fs=SR)
    return signal.oaconvolve(rounded, lowpass[None], "same")


dry = scene()
out = record(dry)
generate_wav(out)
```